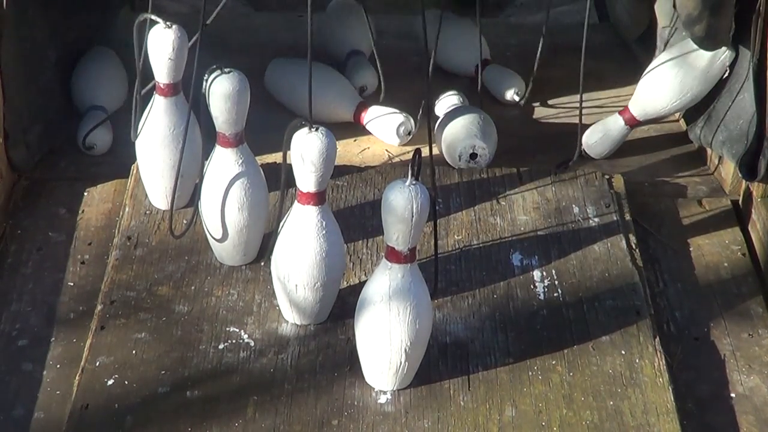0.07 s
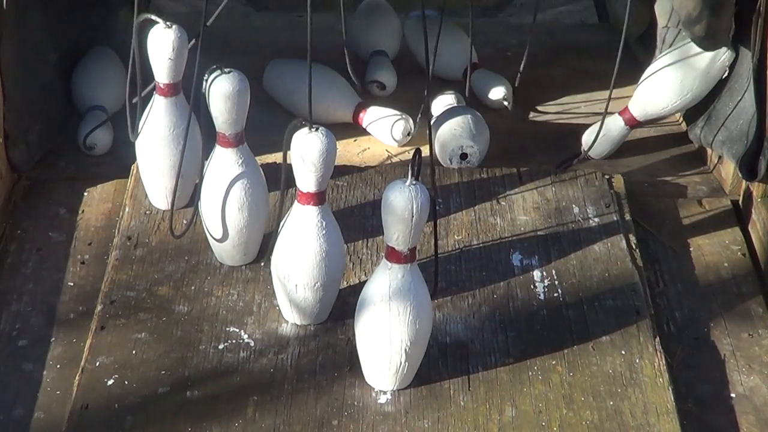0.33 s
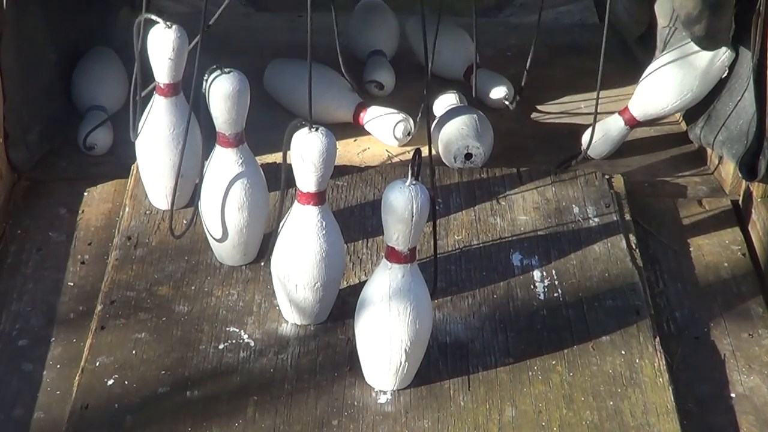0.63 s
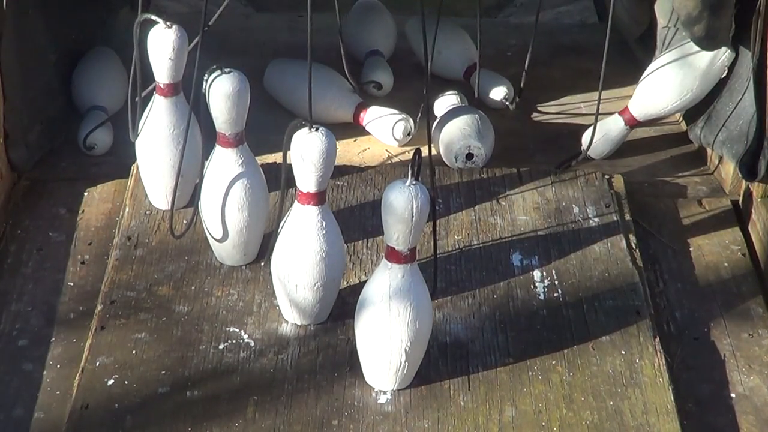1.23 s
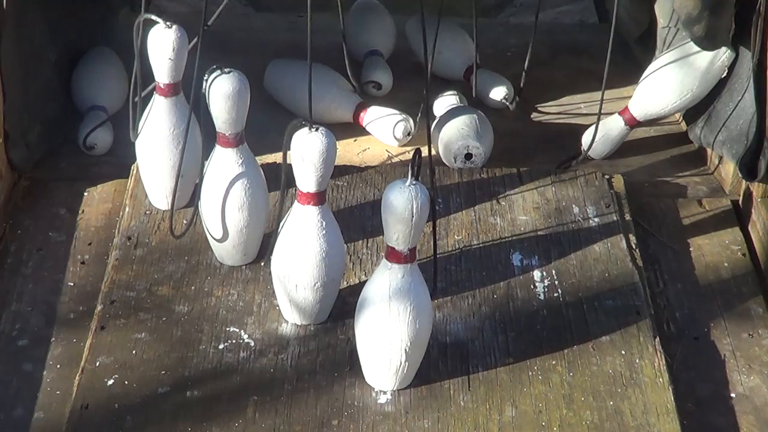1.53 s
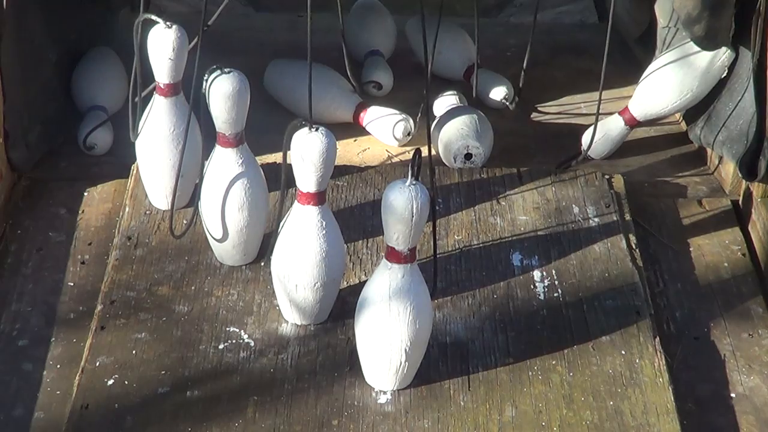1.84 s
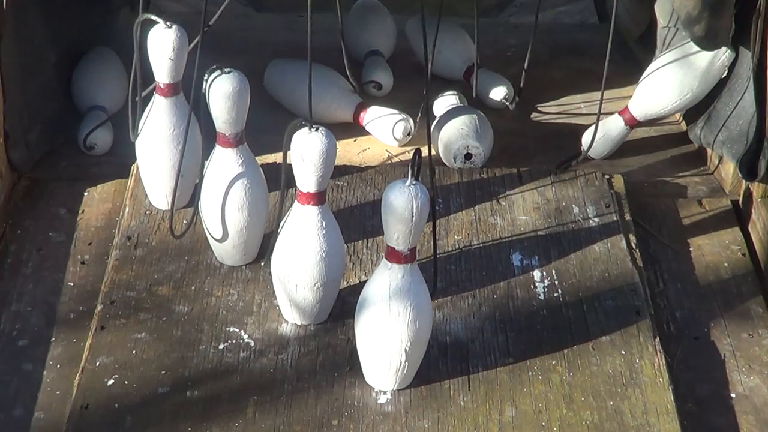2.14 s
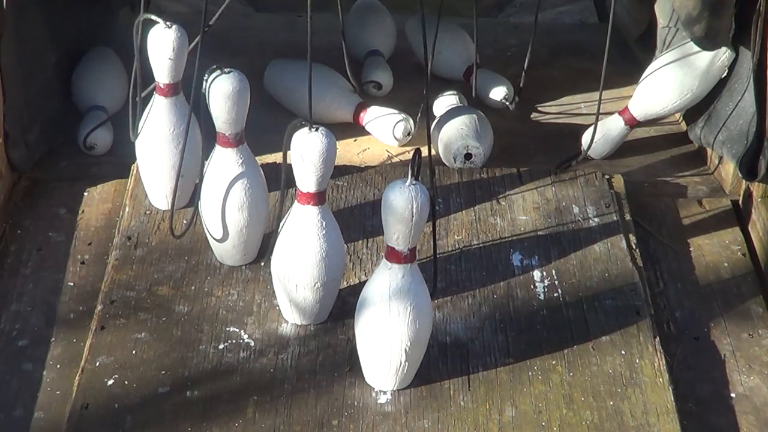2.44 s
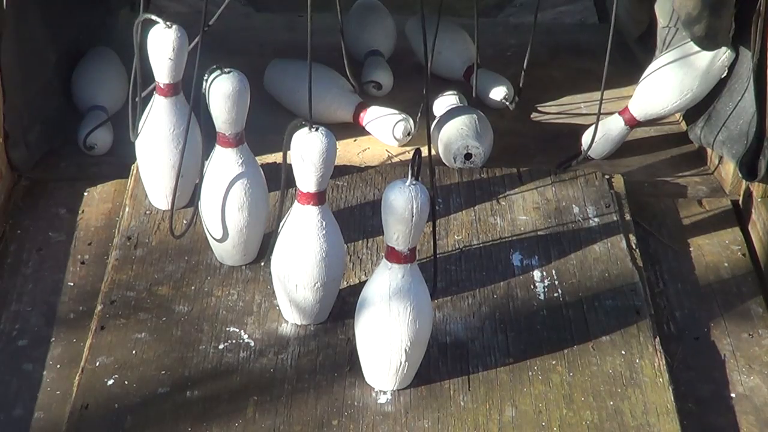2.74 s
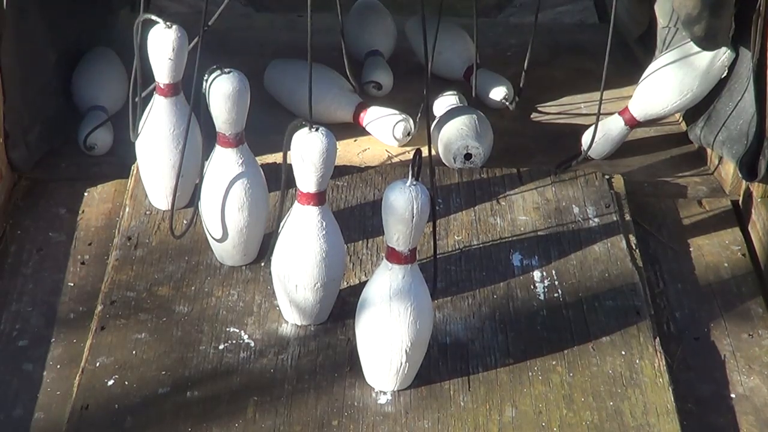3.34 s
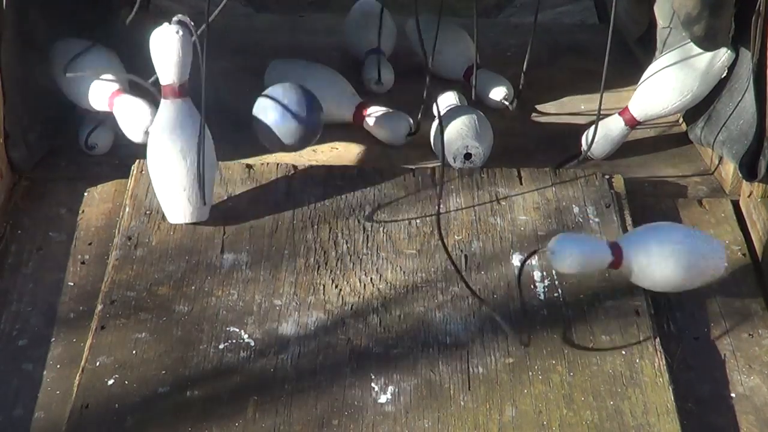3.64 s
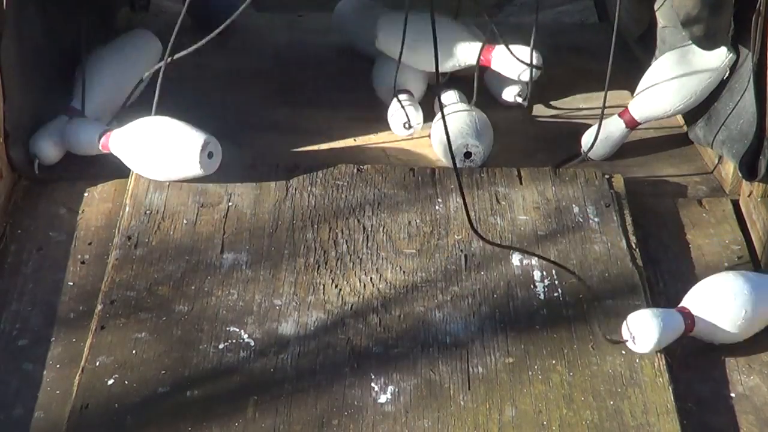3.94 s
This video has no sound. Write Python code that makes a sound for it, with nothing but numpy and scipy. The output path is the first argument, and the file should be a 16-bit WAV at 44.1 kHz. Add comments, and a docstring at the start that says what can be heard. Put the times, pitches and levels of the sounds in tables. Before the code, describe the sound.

A ball rolls down a wooden lane into pins, heard outdoors from beside them. In the first half second, loud hollow knocks hit the boards; softer thumps and a scuff follow, and a faint bird whistles until 1 second. At about 2.2 seconds the ball lands, bounces and rumbles closer over gritty planks, with tiny squeaks. From 3.5 to 4 seconds the wooden pins clatter loudly and ring briefly.

```python
"""A ball rolls down an outdoor wooden skittle lane and scatters the hanging wooden pins.
Heard from beside the pins, it lands, bounces and rumbles closer over gritty planks, which
answer with hollow notes and clicks. Then the pins clatter and ring briefly. Before the throw,
thumps and a scuff sound on the boards while a far bird whistles. Tiny high squeaks come
and go, and soft outdoor air with a thin whine and faint ticking lies under it all."""
import sys
import numpy as np
from scipy import signal
from scipy.fft import rfft, irfft
from scipy.io import wavfile
from scipy.ndimage import uniform_filter1d

SR = 44100
rng = np.random.default_rng(int(sys.argv[2]) if len(sys.argv) > 2 else 0)


def transcribe(signal):
    """Save signal, clipped to [-1, 1], as a 16-bit WAV file at the path in sys.argv[1]."""
    frames = np.atleast_2d(signal).T
    limited = np.clip(frames, -1, 1)
    pcm = np.round(limited * 32767).astype(np.int16)
    wavfile.write(sys.argv[1], SR, pcm)


N = 176400
TIME = np.arange(N) / SR


def amp(db):
    """Turns decibels into a factor to multiply by."""
    return 10 ** (np.asarray(db) / 20)


def unit(x):
    """Scales a sound to an average power of 1."""
    return x / np.sqrt(np.mean(x ** 2) + 1e-20)


def read(points, hz):
    """Reads a curve between its points, giving each octave equal room."""
    f, value = np.transpose(points)
    return np.interp(np.log(hz + 1), np.log(f + 1), value)


def add(mix, s, sound):
    """Mixes a sound in, starting at s seconds."""
    start = round(s * SR)
    sound = sound[..., max(-start, 0):]
    part = mix[:, max(start, 0):][:, :sound.shape[-1]]
    part += sound[..., :part.shape[1]]


def grains(size, per_s, spread_db):
    """Two streams of tiny random hits of uneven strength."""
    strength = amp(spread_db * np.minimum(rng.exponential(1, size), 3.5))
    return rng.standard_normal((2, size)) * strength * (rng.random(size) < per_s / SR)


def ring(tones, hz=1):
    """Struck wood rings with several tones; each drops 60 dB in its fade time."""
    t = np.arange(SR // 4) / SR
    return sum(amp(db - 60 * t / fade) * np.sin(2 * np.pi * f * hz * t) for f, db, fade in tones)


# stereo width, as the side signal's level against the middle's: f/Hz, level/dB
WIDTH = [(60, -22), (250, -28), (700, -15), (2000, -12.5), (4000, -20), (10000, -24)]
def coloured(noise, colour, band=None):
    """Gives two noises a colour (a balance of low and high) and spreads them to left and right."""
    hz = np.fft.rfftfreq(noise.shape[1], 1 / SR) + 1e-3
    gain = amp(read(colour, hz))
    if band:
        gain = gain / np.sqrt((1 + (band[0] / hz) ** 12) * (1 + (hz / band[1]) ** 12))
    middle, side = rfft(noise) * gain
    side = side * amp(read(WIDTH, hz))
    return unit(irfft(np.array([middle + side, middle - side]), noise.shape[1]))


# the four parts of a blow on wood (clack, thud, knock, tick): lowest f/Hz, highest f/Hz
BANDS = [(750, 2400), (62, 250), (250, 850), (2400, 17000)]
def blows(rows, parts, colour):
    """A blow stirs so many tones in wood that they blur into four bands of fading noise."""
    out, t = np.zeros((2, N)), np.arange(16384) / SR
    for s, *levels in rows:
        for db, band, (gain_db, rise, fade, tail_db, tail_fade) in zip(levels, BANDS, parts):
            shape = (1 - np.exp(-t / rise)) * (amp(-60 * t / fade) + amp(tail_db - 60 * t / tail_fade))
            part = unit(shape * coloured(rng.standard_normal((2, len(t))), colour, band))
            opening = np.sqrt(np.mean(unit(shape)[:SR // 50] ** 2))  # the first 20 ms set the level
            add(out, s, amp(db + gain_db) * part / opening)
    return out


# colour of the outdoor air: f/Hz, level/dB
AIR_COLOUR = [(20, 9), (40, 7.5), (70, 6), (150, 6), (330, 1.5), (520, -5), (800, -4), (1750, -14),
              (2400, -17), (5000, -23), (9300, -27), (15000, -28.5), (16000, -34)]
def background(air_db=-42.5, whine_hz=15734, whine_db=-63, ticks_per_s=59.9, tick_hz=5000, tick_db=-51):
    """Outdoor air, with a camera's thin whine and faint, fast ticking."""
    air = coloured(rng.standard_normal((2, N)), AIR_COLOUR)
    whine = np.sqrt(2) * np.sin(2 * np.pi * whine_hz * TIME)
    from_tick = (TIME * ticks_per_s % 1 - .5) / ticks_per_s
    ticks = np.exp(-(from_tick / .0007) ** 2) * np.sin(2 * np.pi * tick_hz * from_tick)
    return amp(air_db) * air + amp(tick_db) * ticks + amp(whine_db) * whine


# the bird's notes: t/s, top f/Hz, level/dB
BIRD_NOTES = [(-.085, 3270, -48.5), (.118, 3420, -46.5), (.32, 3363, -47.5), (0.527, 3330, -49.5),
              (.728, 3265, -49), (0.936, 3180, -53.5)]
# the path of one note: t/s from its start, share of top pitch, level/dB
NOTE_PATH = [(0, .68, -14), (.02, .65, -4), (.05, .59, -12), (.07, .71, -14), (.09, .75, -4), (.1, .9, -9),
             (.11, .985, 0), (.13, 1, 0), (.15, .97, -10)]
def bird(echo_fade_s=1.1):
    """A far bird's whistles dip, then slide up, and the surroundings echo them."""
    out = np.zeros((2, N))
    at, share, shape_db = np.transpose(NOTE_PATH)
    t = np.arange(0, at[-1], 1 / SR)
    shape = amp(np.interp(t, at, shape_db)) * signal.windows.tukey(len(t), .1)
    for s, hz, db in BIRD_NOTES:
        cycles = np.cumsum(hz * np.interp(t, at, share)) / SR
        add(out, s, amp(db) * shape * np.sin(2 * np.pi * cycles))
    echo = rng.standard_normal((2, SR)) * amp(-60 * TIME[:SR] / echo_fade_s)
    return out + signal.fftconvolve(out, echo / np.linalg.norm(echo[0]), axes=1)[:, :N]


# thin squeaks and tinkles: t/s, f/Hz, length/s, level/dB
SQUEAKS = [(0.857, 6560, 0.022, -57.5), (1.364, 10900, 0.019, -51), (3.221, 7400, 0.0047, -30.5),
           (3.229, 7400, 0.0069, -41), (3.241, 7350, 0.0068, -43), (3.267, 7350, 0.0081, -44),
           (3.284, 7300, 0.009, -47), (3.307, 7400, 0.013, -58), (3.347, 7600, 0.013, -44),
           (3.36, 7500, .01, -43), (3.4, 7600, 0.012, -46)]
def squeaks():
    """Brief high bursts, each made of six tones within 9 percent of its pitch."""
    out = np.zeros((2, N))
    for s, hz, length, db in SQUEAKS:
        t = np.arange(0, length, 1 / SR)
        pitches = hz * (1 + .09 * rng.uniform(-0.86, 1, size=(6, 1)))
        tones = np.sin(2 * np.pi * (pitches * t + rng.random(size=(6, 1)))).sum(0)
        add(out, s, amp(db) * unit(tones * np.hanning(len(t))))
    return out


# how the scuff swells and fades: t/s, level/dB
SCUFF = [(1.06, -67), (1.085, -45), (1.13, -43), (1.19, -41.5), (1.25, -44.5), (1.32, -59), (1.38, -54),
         (1.45, -61)]
# its colour: f/Hz, level/dB
SCUFF_COLOUR = [(1180, -22), (2000, -17), (2560, -16.5), (4480, -16), (5270, -15), (8290, -12),
                (10300, -14.5), (15500, -26)]
def scuff():
    """A scuff along the boards: thousands of tiny hits merge into a hiss."""
    hiss = coloured(grains(N, per_s=18000, spread_db=1.5), SCUFF_COLOUR)
    return hiss * amp(np.interp(TIME, *np.transpose(SCUFF), left=-120, right=-120))


# thumps on the boards: t/s, clack/dB, thud/dB, knock/dB, tick/dB
THUMPS = [(0.007, -61, -26.5, -25, -80), (0.062, -43, -23.5, -19, -75), (0.184, -28.5, -16.5, -16.5, -38.5),
          (0.262, -4, -5, -3.5, -13.5), (0.296, -38, -23, -7.5, -57), (0.329, -46, -15, -43, -57),
          (0.381, -18, -10.5, -16, -36), (0.612, -31, -30.5, -31.5, -40.5), (0.778, -21, -28, -16, -36),
          (0.904, -58, -27.5, -32, -46), (1.045, -40, -46, -26.5, -49), (1.08, -37, -32, -22, -39),
          (1.141, -55, -22.5, -29, -46), (1.206, -47, -24, -18, -40), (1.261, -40, -21.5, -18, -50),
          (1.292, -45, -19.5, -37, -41), (1.482, -39.5, -28, -19, -51), (1.524, -51, -27.5, -48, -50),
          (1.861, -44, -40, -18, -50), (1.894, -47, -23.5, -22, -50)]
# the shape of those four parts: gain/dB, rise/s, fade/s, tail/dB, tail fade/s
THUMP_PARTS = [(-12.5, 0.0036, 0.028, -18.5, 0.25), (-4.5, 0.0013, 0.25, -1, 0.32),
               (-7, 0.0029, 0.17, -15.5, 0.73), (-14, 0.0012, 0.019, -16.5, 0.25)]
# their colour: f/Hz, level/dB
THUMP_COLOUR = [(35, -42), (60, -14), (151, 9), (309, -3), (855, -26), (960, -21), (2260, -34), (2780, -41),
                (5430, -39.5), (6090, -39), (7500, -36.5), (11900, -42.5), (15000, -57)]
def thumps():
    """Dull blows shake the boards before the throw."""
    return blows(THUMPS, THUMP_PARTS, THUMP_COLOUR)


# blows that sound a plank's hollow note: t/s, f/Hz, level/dB
HOLLOW_NOTES = [(.184, 166, -11), (0.298, 170, 0), (0.328, 306, -4.5), (.783, 404, -14.5),
                (1.081, 423, -17), (1.262, 443, -19), (1.480, 570, -15), (1.487, 374, -23),
                (1.863, 400, -42), (2.165, 330, -10), (2.306, 605, -14), (2.329, 910, -12.5),
                (2.338, 727, -7.5), (2.501, 276, -12), (2.565, 830, -19), (2.692, 196, -28),
                (2.765, 227, -5.5), (2.825, 160, -8), (2.883, 173, -22), (3.054, 112, -25),
                (3.116, 582, -16), (3.178, 189, -13), (3.211, 129.4, -1), (3.309, 157, -4),
                (3.426, 122, -26), (3.641, 610, -3), (3.727, 798, 6), (3.858, 207, -3.5)]
# a plank's tones: multiple of its pitch, level/dB, fade/s for a 595 Hz note
PLANK_TONES = [(.66, -25, 0.063), (1.002, 0.5, 0.037), (1.188, -5.5, 0.049), (1.58, -28, 0.017)]
# loose planks clicking under the ball: t/s, f/Hz, level/dB
CLICKS = [(2.307, 2670, -31.5), (2.5, 2810, -26.5), (2.544, 2890, -28), (2.569, 2780, -28),
          (2.692, 3380, -31), (2.825, 3200, -22.5), (2.884, 3140, -29.5), (2.899, 2180, -26),
          (2.912, 2300, -33), (2.958, 2330, -34), (3.210, 2350, -37)]
# a click's tones: multiple of its pitch, level/dB, fade/s
CLICK_TONES = [(.83, -12, 0.015), (1, -1.5, 0.018), (1.18, -7.5, .02)]
def planks(rise_s=.002):
    """Struck planks give short hollow notes, and loose ones click."""
    out = np.zeros((2, N))
    for s, hz, db in HOLLOW_NOTES:
        linger = (595 / hz) ** 0.2  # lower notes ring longer
        note = ring([(ratio, level, fade * linger) for ratio, level, fade in PLANK_TONES], hz)
        add(out, s, amp(db) * note * (1 - np.exp(-TIME[:len(note)] / rise_s)))
    for s, hz, db in CLICKS:
        add(out, s, amp(db) * ring(CLICK_TONES, hz))
    return out


# hard raps of a ball against wood: t/s, level/dB
RAPS = [(.394, 2.5), (.5935, -4.5), (.640, -20.5), (.658, -21.5), (2.165, -4), (2.306, -16), (2.564, -18),
        (3.511, -6), (3.525, -15), (3.593, -8), (3.729, -10)]
# a rap's tones before its treble is softened: f/Hz, level/dB, fade/s
RAP_TONES = [(1090, -12, 0.019), (1380, -21, 0.018), (1670, -15, 0.0097), (2430, -32, 0.034),
             (3140, -31, .012)]
def ball_raps(top_hz=2800):
    """A ball strikes wood with a hard, very short ring."""
    out = np.zeros((2, N))
    rap = signal.sosfilt(signal.butter(6, top_hz, fs=SR, output="sos"), ring(RAP_TONES))
    for s, db in RAPS:
        add(out, s, amp(db) * rap)
    return out


# the ball hitting the lane: t/s, clack/dB, thud/dB, knock/dB, tick/dB
BUMPS = [(2.116, -37, -39, -33, -50.5), (2.164, -6.5, -12.5, -7.5, -35.5), (2.189, -18, -7.5, -11.5, -33.5),
         (2.268, -32, -18.5, -22.5, -48), (2.304, -20.5, -19.5, -15, -52), (2.33, -21, -42, -11.5, -45.5),
         (2.37, -55, -18, -20, -44), (2.392, -25, -29, -36, -44), (2.422, -22.5, -27, -27, -46),
         (2.504, -17, -13.5, -17.5, -43), (2.528, -22, -17.5, -17, -38), (2.563, -17.5, -23, -20, -41.5),
         (2.589, -20, -33, -30, -39.5), (2.627, -25.5, -23, -27, -42), (2.691, -24, -10.5, -14.5, -36.5),
         (2.722, -24.5, -20, -36, -42), (2.765, -19.5, -12.5, -18, -40), (2.826, -16.5, -4, -16, -34),
         (2.882, -19, -8.5, -19.5, -37.5), (2.909, -15.5, -7, -59, -41.5), (2.957, -16.5, -11, -18, -34.5),
         (2.992, -14, -16, -19.5, -37), (3.028, -24, -11, -39, -50), (3.057, -33, -14, -47, -50),
         (3.097, -39, -13.5, -19.5, -43), (3.145, -22.5, -28, -15.5, -46), (3.178, -26, -9.5, -30, -49),
         (3.209, -16.5, -8.5, -20.5, -44), (3.249, -35, -7.5, -19, -48), (3.262, -14, -12.5, -17, -58),
         (3.308, -18, -11, -22.5, -42.5), (3.335, -17.5, -7, -14.5, -38), (3.394, -9.5, -21, -17.5, -38),
         (3.426, -30, -11.5, -23, -46), (3.448, -16, -18, -18.5, -35), (3.487, -19, -22.5, -17, -35.5)]
# the shape of those four parts: gain/dB, rise/s, fade/s, tail/dB, tail fade/s
BUMP_PARTS = [(-14, 0.00047, 0.092, -23, 0.37), (-2, 0.0076, 0.084, -12, 0.24),
              (-3, 0.00069, 0.12, -13.5, 0.78), (-4, 0.00038, 0.018, 0.5, 0.18)]
# their colour: f/Hz, level/dB
BUMP_COLOUR = [(29, -48), (50, -4.5), (110, -1.5), (153, 9.5), (230, -2), (329, -4), (518, -13.5),
               (778, -19), (836, -18.5), (919, -22), (1410, -27), (3340, -39.5), (4440, -46), (9530, -54),
               (15000, -68)]
def ball_bumps():
    """The ball lands, bounces and jolts over the planks."""
    return blows(BUMPS, BUMP_PARTS, BUMP_COLOUR)


# the roll as the ball comes closer: t/s, rumble/dB, crackle/dB
ROLL = [(2.15, -26, -61), (2.3, -28.5, -64), (2.65, -30.5, -55), (2.85, -31, -53.5), (3.2, -34, -54.5),
        (3.45, -14, -41), (3.6, -16, -49), (3.72, -18, -29), (3.8, -24.5, -37), (3.87, -11, -47),
        (4, -39, -75)]
# colours of the rumble and of the grit: f/Hz, level/dB
RUMBLE_COLOUR = [(25, -40), (45, -50), (65, -16), (90, 14.5), (170, 9.5), (285, -6.5), (550, -14.5),
                 (820, -13), (1400, -21), (2100, -23), (2700, -41.5), (5000, -45)]
GRIT_COLOUR = [(1500, -5), (4000, -2.5), (6800, 2), (10500, 0), (15000, -8)]
# single crunches of grit: t/s, length/s, level/dB
CRUNCHES = [(2.208, 0.0089, -39), (2.766, 0.016, -38.5), (2.821, 0.005, -42), (2.954, 0.003, -47),
            (2.978, 0.017, -36.5), (3.005, .008, -35), (3.026, 0.0072, -36), (3.059, 0.0074, -33.5),
            (3.094, 0.021, -32.5), (3.145, 0.01, -36), (3.175, .008, -35), (3.225, 0.0013, -26.5),
            (3.391, 0.0083, -35), (3.427, 0.012, -31.5), (3.451, 0.014, -39.5), (3.508, 0.0091, -20.5),
            (3.623, 0.0012, -20.5), (3.732, .011, -14.5), (3.814, 0.011, -25)]
def ball_roll():
    """Many small bumps blend into a rumble while grit crackles and is crushed under the ball."""
    times, rumble_db, crackle_db = np.transpose(ROLL)
    rumble = coloured(grains(N, per_s=260, spread_db=2), RUMBLE_COLOUR)
    crackle = coloured(grains(N, per_s=900, spread_db=3.5), GRIT_COLOUR)
    out = rumble * amp(np.interp(TIME, times, rumble_db, left=-120))
    out += crackle * amp(np.interp(TIME, times, crackle_db, left=-120))
    t = np.arange(4096) / SR
    for s, length, db in CRUNCHES:
        crunch = coloured(grains(len(t), per_s=3500, spread_db=1.5), GRIT_COLOUR)
        add(out, s, amp(db) * np.exp(-(t / length) ** 4) * crunch)
    return out


# ringing wooden clacks: t/s, f/Hz, level/dB
RINGING_CLACKS = [(3.264, 1750, -32), (3.511, 2250, -24), (3.523, 1680, -17), (3.554, 1800, -17),
                  (3.564, 2160, -19), (3.595, 1933, -6), (3.632, 2110, -25), (3.819, 2155, -11),
                  (3.835, 2150, -11), (3.872, 2220, -18), (3.905, 1930, -25), (3.995, 2150, -21)]
# a clack's tones: multiple of its pitch, level/dB, fade/s
CLACK_TONES = [(.69, -13, .06), (.77, -14, .08), (.84, -14, .09), (1, 0, .1), (1.105, -11, .06),
               (1.46, -28, .07), (1.92, -30, .06)]
def ringing_clacks():
    """Wood rings briefly: one faint clack as the ball rolls, then the struck pins."""
    out = np.zeros((2, N))
    for s, hz, db in RINGING_CLACKS:
        add(out, s, amp(db) * ring(CLACK_TONES, hz))
    return out


# blows on the pins: t/s, clack/dB, thud/dB, knock/dB, tick/dB
CRASH = [(3.509, -7, -48, -15, -34), (3.522, -3.5, -45, -26, -24.5), (3.553, -12.5, -10, -16.5, -24.5),
         (3.566, -10, -19, -20, -24), (3.594, -8, -13, -19, -22), (3.63, -5.5, -12, -8.5, -17),
         (3.644, -22, -1, -16, -39), (3.661, -12.5, -35, -14, -19), (3.7, -29, -39, -36, -22.5),
         (3.728, -1.5, -11, -4.5, -23), (3.743, 0.5, -7.5, -8, -17.5), (3.764, -4.5, -15, -9, -24),
         (3.795, -24, -13, -23, -28), (3.817, -22, -24, -15, -29), (3.833, -10, -32, -16, -29),
         (3.857, -11, -6, -15.5, -33), (3.882, -23, -22, -13.5, -28), (3.902, -20, -21, -15.5, -33),
         (3.93, -5.5, -5, -8.5, -23.5), (3.942, -15, -8.5, -20, -51), (3.96, -10, -21.5, -12.5, -32),
         (3.993, -15, -35, -19, -23.5)]
# the shape of those four parts: gain/dB, rise/s, fade/s, tail/dB, tail fade/s
CRASH_PARTS = [(-14, 0.00039, 0.091, -12.5, 0.24), (-7.5, 0.0023, 0.16, -26, 0.54),
               (-1, 0.0011, 0.12, -25, 0.21), (-9, 0.00053, 0.024, 1.5, 0.14)]
# their colour: f/Hz, level/dB
CRASH_COLOUR = [(29, -50), (50, -27), (87, -15), (150, 9), (259, -6.5), (322, -13.5), (362, -10),
                (724, -18), (987, -13.5), (1310, -15), (2120, -21.5), (2760, -27), (5380, -33), (9530, -34),
                (15000, -42.5)]
def pins():
    """The ball knocks the pins clattering into each other, the floor and the walls."""
    return blows(CRASH, CRASH_PARTS, CRASH_COLOUR)


# how much louder the left side is than the right: f/Hz, level/dB
BALANCE = [(40, 7), (90, -4), (170, -2), (350, -0.4), (800, 0.3), (12000, -0.1)]
# how far the left side's wave runs ahead: f/Hz, phase/radians
LEFT_LEAD = [(0, 0), (260, 0.6), (2240, 0.23), (7240, 0.64), (8350, 0.28), (16200, 0.038)]
def scene():
    """Adds up all the sounds; most of the bass leans to the right."""
    mix = thumps() + scuff() + planks() + ball_raps() + ball_bumps() + ball_roll()
    mix += ringing_clacks() + pins() + bird() + squeaks() + background()
    hz = np.fft.rfftfreq(N, 1 / SR)
    lean = amp(read(BALANCE, hz) / 2) * np.exp(.5j * read(LEFT_LEAD, hz))
    return irfft(rfft(mix) * np.array([lean, 1 / lean]), N)


def record(dry, low_cut_hz=62, limit_db=-10, recover_db_per_s=170, top_hz=15950):
    """The microphone sheds deep bass, a fast limiter turns loud moments down, the top treble is cut."""
    dry = signal.sosfilt(signal.butter(2, low_cut_hz, btype="high", fs=SR, output="sos"), dry)
    power_db = 10 * np.log10(abs(uniform_filter1d((dry ** 2).mean(0), size=130)) + 1e-12)
    fall = TIME * recover_db_per_s
    peak_db = np.maximum.accumulate(power_db + fall) - fall  # jumps up at once, sinks steadily
    over_db = uniform_filter1d(np.maximum(peak_db - limit_db, 0), size=90)
    held = dry / amp(1.25 * over_db)  # 1.25 dB down for each dB over the limit
    treble_cut = signal.firwin(511, top_hz, window=("kaiser", 9), fs=SR)
    return signal.oaconvolve(held, treble_cut[None], "same")


dry = scene()
out = record(dry)
transcribe(out)
```